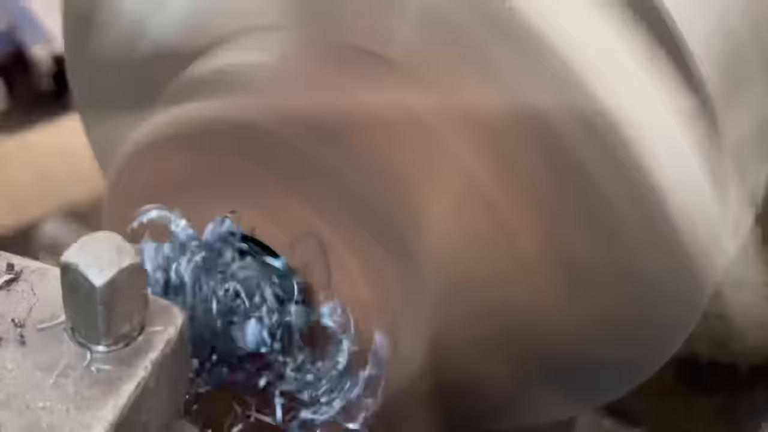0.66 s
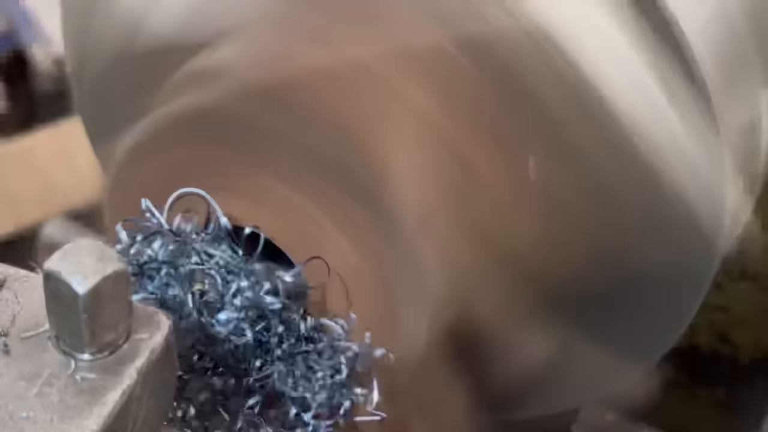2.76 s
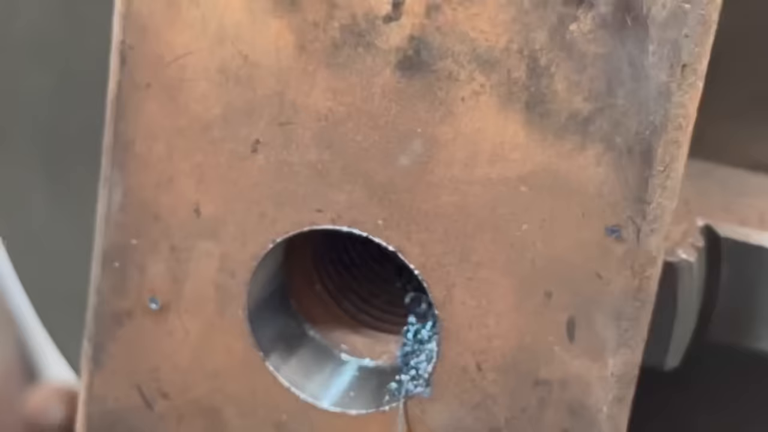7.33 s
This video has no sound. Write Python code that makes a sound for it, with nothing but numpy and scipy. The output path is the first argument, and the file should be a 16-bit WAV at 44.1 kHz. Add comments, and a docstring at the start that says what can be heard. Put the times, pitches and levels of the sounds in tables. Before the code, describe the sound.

From the start, a lathe tool boring steel gives a loud, piercing squeal, close by in a workshop. It wobbles rapidly, and at about 0.6 seconds it jumps slightly higher and turns rougher, over the bright rasp of shearing chips. From about 2.5 seconds the squeal stutters in short bites, then stops abruptly around 3.3 seconds. Everything afterwards is much quieter. The spindle whirrs freely with a few faint metallic rings and coasts down between about 4.7 and 6 seconds. The motor's steady low hum and fan noise carry on, gradually growing louder. From about 6 seconds a rough low drone swells, strongest around 7 to 8.3 seconds, with a few faint high squeaks and tiny ticks. At about 8.8 seconds comes one short, gritty hiss with a metallic ring. The motor hums on until the end, at about 9.5 seconds.

```python
"""Boring steel on a lathe.

The boring bar chatters: a loud squeal that wobbles once a turn, over the rasp of the shearing chip.
The tool breaks through in short bites; the spindle whirrs free and coasts down. The motor hums on,
louder as the phone moves. A low drone swells, with faint squeaks and ticks; one short hiss follows."""
import sys
import numpy as np
from scipy import signal
from scipy.fft import rfft, irfft, next_fast_len
from scipy.io import wavfile
from scipy.ndimage import uniform_filter1d

SR = 44100
rng = np.random.default_rng(int(sys.argv[2]) if len(sys.argv) > 2 else 0)


def log_audio(samples):
    """Write samples as a 16-bit WAV file to the path given in sys.argv[1]."""
    # one column per channel
    frames = np.atleast_2d(samples).T
    # limit to full scale, then quantise
    limited = np.clip(frames, -1, 1)
    pcm = np.round(limited * 32767).astype(np.int16)
    wavfile.write(sys.argv[1], SR, pcm)


N = 422478
T = np.arange(N) / SR
JUMP_S, BREAKTHROUGH_S, CHIP_END_S, CLEAR_S = .587, 2.73, 2.785, 3.306  # stages of the cut

# noise spectra: f/Hz, relative level/dB
FAN_SPECTRUM = [(50, -40), (200, -14), (400, -4.5), (650, -1.5), (900, -5), (1400, -4.5), (1700, -9),
                (2300, -8.5), (3000, -11.5), (3800, -8.5), (4300, -18.5), (4900, -9.5), (7200, -26),
                (10400, -24), (16000, -38)]
RUMBLE_SPECTRUM = [(25, -48), (50, -19), (75, -20), (100, 1.5), (135, -8), (200, 0), (330, -3), (420, -8),
                   (700, -34)]
TICK_SPECTRUM = [(3000, -25), (8000, -8), (10500, 2), (15500, 0)]
HISS_SPECTRUM = [(200, -30), (400, -0.5), (1400, -1.5), (2200, -6), (4800, -5), (6500, -9.5), (9000, -9.5),
                 (16000, -12)]
WHIRR_SPECTRUM = [(50, -40), (150, -10), (300, -9.5), (500, -7.5), (760, -6.5), (950, -1.5), (1150, 2),
                  (1550, -3.5), (1950, -5), (2400, -1.5), (3200, -2), (3900, -8.5), (5100, -10.5),
                  (6200, -17.5), (8100, -18), (16000, -31.5)]
RASP_SPECTRUM = [(2000, -26), (3800, -11), (4800, -9.5), (6500, -10.5), (7400, -5), (8800, 2), (9700, 5.5),
                 (10600, 0.5), (12300, -1), (13200, -11), (14500, -22), (15500, -15)]
# resonances: f/Hz, width/Hz, relative level/dB
CASING_MODES = [(1473, 105, 5.5), (2640, 106, 5.5), (3850, 260, -7), (4770, 250, -8)]
HISS_MODES = [(495, 31, 12), (1350, 160, -8), (2694, 32, 8), (3710, 90, 0), (4330, 55, -4), (4880, 110, -2),
              (8820, 70, -5)]
TOOL_POST_MODES = [(9160, 100, 6), (9700, 240, 6)]
LOW_NOTE_MODES = [(4370, 790, -6.5), (9700, 400, 5), (11800, 700, 0)]
# motor hum: t/s, level/dB
HUM_LEVEL = [(0.0, -54), (0.08, -52.5), (3.71, -51), (6.67, -45.5), (7.15, -45), (9.58, -38)]
# motor whine, gears at top speed: f/Hz, relative level/dB
WHINE_TONES = [(1255, -61), (1433, -60), (2106, -64), (2219, -67), (2316, -60.5), (2663, -51.5),
               (2850, -68), (2905, -67), (3026, -66), (3247, -63.5), (3678, -67), (3918, -62.5),
               (4960, -67.5)]
GEAR_TONES = [(470, -20.5), (942, -21.5), (1098, -16), (1184, -24), (1265, -23.5), (1502, -14),
              (1800, -21.5), (2140, -21), (2300, -18), (2444, -16.5), (2690, -15.5), (3009, -21),
              (3275, -18.5)]
# drone partials: order, relative level/dB, flutter/dB
DRONE_ORDERS = [(1, -17, 3), (2, -0.5, 1), (2.5, -14, 2), (3, 0, 2), (3.07, -7.5, 3.5), (3.25, -13, 1.5),
                (3.5, -10, 3.5)]
# lingering drone partials: order, level/dB
LINGERING_ORDERS = [(1, -58), (3.47, -52.5)]
# drone swells: centre t/s, half length/s, gain/dB
DRONE_SWELLS = [(7.003, .24, 6), (7.6, 0.5, 11.5), (8.3, 0.087, 8)]
# squeaks: t/s, f/Hz, level/dB
SQUEAKS = [(6.03, 10600, -62), (7.83, 10500, -58), (8.23, 11400, -53.5)]
# spindle speed: t/s, rate/Hz
SPINDLE_SPEED = [(0, 18.42), (1.2, 18.42), (1.5, 18.68), (4.6, 18.75), (4.9, 17.6), (5.6, 14.5)]
# spindle rings: centre t/s, half length/s, f/Hz, level/dB
SPINDLE_RINGS = [(3.8, .08, 1107, -54), (4.227, .025, 1110, -52), (4.6, .14, 1503, -55),
                 (5.2, 0.12, 1766, -59)]
# breakthrough bites: t/s, length/s, force/dB, depth of the gap after (0-1)
BITES = [(2.482, 0.043, -0.5, 0.84), (2.526, 0.051, 0.5, .7), (2.581, 0.047, 1, 0.7),
         (2.631, 0.048, 0.5, 0.6), (2.688, 0.036, -1, .9), (2.746, 0.037, -1, 0.5), (2.796, 0.028, 0, 0.7),
         (2.855, 0.025, 1.5, 0.2), (2.905, 0.037, -1, 0), (2.958, 0.031, 1.5, 0), (2.99, 0.051, 0, 0),
         (3.065, 0.039, 0, .1), (3.109, 0.047, 1.5, .65), (3.182, 0.025, 1, .95), (3.226, 0.027, 4.5, 1),
         (3.287, 0.016, 3.5, 0)]
# chatter pitch: t/s, f/Hz, wobble scale/Hz
CHATTER_PITCH = [(0, 2599, 20), (.51, 2602, 20), (.535, 2712, 36), (.56, 2605, 30), (.59, 2726, 32),
                 (.72, 2725, 44), (.83, 2732, 44), (.92, 2754, 17), (1.08, 2752, 15), (1.13, 2778, 27),
                 (1.38, 2792, 24), (1.52, 2798, 6), (1.79, 2803, 14), (1.86, 2829, 15), (2.3, 2831, 8),
                 (2.66, 2843, 11), (2.92, 2866, 11), (3.3, 2876, 11)]
# chatter fundamental at the microphone ports: f/Hz, left level/dB, right level/dB
PORT_LEVEL = [(2600, -30.5, -29.3), (2745, -33.5, -23), (2790, -42, -23.6), (2830, -42, -23.7),
              (2870, -38.5, -24.5)]
# right port behind left: f/Hz, lag/rad
PORT_LAG = [(2600, 2.7), (2820, 3.2), (2865, 4.95), (5200, 6.9), (7800, 6.3), (11400, 6.6), (13000, 8.3),
            (13750, 10.2), (14130, 11.0), (14340, 11.7), (15600, 12.1)]
# overtone radiation of bar and tool post: f/Hz, relative level/dB
BAR_RADIATION = [(5200, -1.5), (5500, -3), (5650, -1.5), (5750, -21), (7800, -10), (8250, -7), (8500, 2),
                 (8620, -11.5), (10400, -2), (11000, -5), (11300, 3), (11480, -9), (12750, 5), (13750, 6),
                 (14300, 3), (15600, -4.5)]
# sidebands: chatter order, segment rates added
SIDEBAND_ORDERS = [(1, 1), (2, -1), (2, 1), (3, -1), (3, 1), (4, -1)]
# same rows: level/dB at JUMP_S, level/dB at CHIP_END_S
SIDEBAND_LEVELS = [(-57.5, -56.5), (-62.5, -52), (-56, -70), (-54.5, -47), (-44, -65), (-51, -72)]


def undb(db):
    """Decibels to gain."""
    return 10 ** (np.asarray(db) / 20)


def unit(x):
    """Scale to rms 1."""
    return x / np.sqrt(np.mean(x ** 2))


def ramp(middle_s, length_s):
    """Linear rise, 0 to 1."""
    return np.clip((T - middle_s) / length_s + .5, 0, 1)


def swell(centre_s, half_s):
    """Gaussian bell, peak 1."""
    return np.exp(-((T - centre_s) / half_s) ** 2)


def since(start_s):
    """Seconds elapsed, 0 before the start."""
    return np.maximum(T - start_s, 0)


def curves(table):
    """Table columns interpolated over time."""
    times_s, *columns = np.transpose(table)
    return [np.interp(T, times_s, column) for column in columns]


def colour(spectrum, hz):
    """Gain of a spectrum at given frequencies."""
    points_hz, db = np.transpose(spectrum)
    return undb(np.interp(np.log(hz + 1), np.log(points_hz), db))


def walk(rate_hz):
    """Smooth random drift, spread near 1."""
    k = max(int(SR / rate_hz), 2)
    steps = np.repeat(rng.standard_normal(N // k + 1), k)
    return 1.308 * uniform_filter1d(uniform_filter1d(steps, k), k)[:N]


def angle(hz):
    """Running phase in rad."""
    return 2 * np.pi * np.cumsum(hz) / SR


def noise(spectrum=None, modes=None, side_db=-12):
    """Stereo noise, rms 1, shaped by a spectrum or resonances; bass near mono."""
    size = next_fast_len(N)
    hz = np.arange(size // 2 + 1) * SR / size
    if modes is None:
        gain = colour(spectrum, hz)
    else:
        gain = np.sqrt(sum((undb(db) / (1 + 2 * ((hz - f) / width) ** 2)) ** 2 for f, width, db in modes))
    spread = undb(side_db) * colour([(200, -13.5), (700, -6), (3000, 7.5), (7000, -15.5)], hz)
    mid, side = rfft(rng.standard_normal((2, size)))
    stereo = mid + np.array([[1], [-1]]) * spread * side
    return unit(irfft(gain * stereo, size)[:, :N])


def tones(rows, speed, stray_hz, flutter_db, flutter_hz=18):
    """Tones scaled in pitch by speed, each with its own drift, flutter and stereo lag."""
    out = np.zeros((2, N))
    for hz, db in rows:
        phase = angle(hz * speed + stray_hz * walk(30))
        lag_rad = min(hz / 2500, .6) * rng.standard_normal()
        out += np.sqrt(2) * undb(db + flutter_db * walk(flutter_hz)) * np.sin([phase, phase + lag_rad])
    return out


def workshop(x, t60_s=.8, treble_t60_s=.29, split_hz=5000):
    """Dense stereo reverberation; treble dies first."""
    t = np.arange(SR // 2) / SR
    scatter = rng.standard_normal((2, len(t))) * (t > .003)
    low = signal.sosfilt(signal.butter(2, split_hz, fs=SR, output="sos"), scatter)
    tail = low * undb(-60 * t / t60_s) + (scatter - low) * undb(-60 * t / treble_t60_s)
    tail /= np.sqrt(np.sum(tail ** 2, axis=1, keepdims=True))
    return signal.fftconvolve(x[None], tail, axes=1)[:, :N]


def motor(hum_hz=179.8, shaft_hz=22.27, throb_db=2):
    """Magnetic hum, fan air ringing the casing, whine throbbing with the shaft, rumble."""
    hum_db, = curves(HUM_LEVEL)
    shade = 1 - ramp(4.85, 1.6)  # fan and whine come into the open
    hum = tones([(hum_hz, 0)], 1, stray_hz=.35, flutter_db=.5)
    fan_gain = undb(-3.5 - 4.5 * shade + .52 * walk(14))
    air = undb(-.5) * noise(FAN_SPECTRUM, side_db=-5.5)
    casing = undb(-8) * noise(modes=CASING_MODES, side_db=-14)
    throb = undb(throb_db * np.sin(angle(shaft_hz + 2 * walk(10))))
    whine = undb(42 - 7 * shade) * tones(WHINE_TONES, 1, stray_hz=5, flutter_db=2.2, flutter_hz=110)
    rumble = undb(-6.5 + 1.4 * walk(9.9)) * noise(RUMBLE_SPECTRUM, side_db=-6)
    return undb(hum_db) * (hum + fan_gain * (air + casing) + throb * whine + rumble)


def drone(start_hz=106, end_hz=97.8, rise_db_per_s=6.5, risen_s=6.26):
    """Rough low drone: swells, sags in pitch and beats; two orders linger."""
    hz = start_hz + (end_hz - start_hz) * ramp(6.68, 1.09)
    swells_db = sum(db * swell(centre_s, half_s) for centre_s, half_s, db in DRONE_SWELLS)
    level_db = -55.5 - rise_db_per_s * np.maximum(risen_s - T, 0) + swells_db
    orders = sum(tones([(order, db)], hz, stray_hz=1.794, flutter_db=flutter_db, flutter_hz=40)
                 for order, db, flutter_db in DRONE_ORDERS)
    lingering = ramp(7.77, .93) * tones(LINGERING_ORDERS, hz, stray_hz=2.86, flutter_db=1)
    return undb(level_db) * orders + lingering


def bump():
    """Soft, low noise bump."""
    return undb(-50) * swell(3.76, .055) * noise(RUMBLE_SPECTRUM)


def rattle(ticks_per_s=42, decay_s=.003, scatter_db=4):
    """Tiny uneven ticks, as of loose chips settling."""
    hits = (rng.random(N) < ticks_per_s / SR) * undb(scatter_db * rng.standard_normal(N))
    ticks = unit(signal.lfilter([1], [1, -np.exp(-1 / (decay_s * SR))], hits))
    return undb(-68.5) * swell(7.8, 1.1) * ticks * noise(TICK_SPECTRUM)


def squeaks(rise_s=.015, t60_s=.22, stray_hz=110):
    """Faint high squeaks, ringing briefly."""
    scratch = angle(stray_hz * walk(1500))
    out = 0
    for start_s, hz, db in SQUEAKS:
        envelope = np.minimum(since(start_s) / rise_s, 1) * undb(db - 60 * since(start_s + rise_s) / t60_s)
        out += np.sqrt(2) * envelope * np.sin(2 * np.pi * hz * T + scratch)
    return out


def hiss(start_s=8.803, rise_s=.037, hold_s=.052, fade_s=.31, grit_db=1.5):
    """Short gritty hiss with a metallic ring, then a faint high puff."""
    rise = np.minimum(since(start_s) / rise_s, 1)
    fade = np.maximum(1 - since(start_s + rise_s + hold_s) / fade_s, 0)
    air = fade ** 1.7 * undb(grit_db * walk(220)) * noise(HISS_SPECTRUM, side_db=-8)
    ring = fade * undb(-3) * noise(modes=HISS_MODES)
    puff = undb(-52) * swell(9.35, .03) * noise(TICK_SPECTRUM)
    return undb(-37) * rise * (air + ring) + puff


def spindle(turn_rad, speed, peak_s=4.77, fade_10db_s=.91, drive_off_s=4.65):
    """Gears whine and the spinning block stirs air; both fade on the coast-down."""
    level_db = -45 - .83 * np.maximum(peak_s - T, 0) - 10 * (since(peak_s) / fade_10db_s) ** 2
    air = noise(WHIRR_SPECTRUM, side_db=-7.5) * undb(np.cos(turn_rad) + .5 * walk(10))
    gears = undb(-12 * since(drive_off_s)) * tones(GEAR_TONES, speed, stray_hz=7.14, flutter_db=3)
    return undb(level_db) * (air + gears)


def spindle_rings():
    """Brief metallic rings from the free-running spindle."""
    return sum(swell(centre_s, half_s) * tones([(hz, db)], 1, stray_hz=14, flutter_db=2.5)
               for centre_s, half_s, hz, db in SPINDLE_RINGS)


def load(turn_rad, spot_turns=.19, width_turns=.1915):
    """The edge meets one hard spot per turn, never quite alike; mean 0, rms 1."""
    offset_turns = (turn_rad / (2 * np.pi) - spot_turns + .5) % 1 - .5
    spot = np.exp(-(offset_turns / width_turns) ** 2) * (1 + .309 * walk(18))
    return unit(spot - spot.mean())


def contact(edge_s=.0048, gap_delay_s=.0068, gap_half_s=.0038):
    """Grip of the edge, steady then in bites, and a gate that dips the note between bites."""
    grip, gate = 1 - ramp(BITES[0][0], edge_s), 1
    for start_s, length_s, db, depth in BITES:
        end_s = start_s + length_s
        grip += undb(db) * (ramp(start_s, edge_s) - ramp(end_s, edge_s))
        gate *= 1 - depth * swell(end_s + gap_delay_s, gap_half_s)
    return grip, gate


def rough_state():
    """0 on the low note, 1 on the rough high note: one flick up, then the jump."""
    return ramp(JUMP_S, .014) + swell(.544, .014)


def release_db(fall_db_per_s=123, graze_s=3.402):
    """The cut dies away once the edge is clear, with one last graze."""
    return -5 * ramp(CLEAR_S, .011) - fall_db_per_s * since(CLEAR_S) + 8 * swell(graze_s, .012)


def rasp_top(grip, fall_db_per_s=10):
    """Bright top edge of the chip's rasp: a fine hiss near 15 kHz."""
    gain = undb(-42 - fall_db_per_s * T) + undb(-46) * ramp(CHIP_END_S, .02)
    touch = .89 * grip + .2 * (1 - ramp(CLEAR_S, .02))
    return touch * gain * noise(modes=[(14900, 1200, 0)])


def chip_rasp(grip, last_chip_s=2.872):
    """The chip shears in tiny uneven steps and rings the tool post; weaker on thin bites."""
    rough = rough_state()
    thin = ramp(CHIP_END_S, .12) - swell(last_chip_s, .025)
    level_db = -49 + 14.5 * rough - 14 * thin + release_db()
    shear = noise(RASP_SPECTRUM, side_db=-20) * undb(2 * walk(900))
    post = undb(-7) * noise(modes=TOOL_POST_MODES, side_db=-15)
    low_note_ring = undb(-44.5) * (1 - rough) * noise(modes=LOW_NOTE_MODES)
    return (shear + post) * undb(level_db) * (.24 + .54 * grip) + low_note_ring


def sidebands(phase, segment_hz=922, rise_hz_per_s=58, stray_hz=22, flutter_db=3):
    """Chip segments shake the bar, adding clashing tones beside its harmonics."""
    segment_phase = angle(segment_hz + rise_hz_per_s * since(JUMP_S) + stray_hz * walk(200))
    out = 0
    for (order, side), ends_db in zip(SIDEBAND_ORDERS, SIDEBAND_LEVELS):
        level_db = np.interp(T, [JUMP_S, CHIP_END_S], ends_db) + flutter_db * walk(120)
        out += np.sqrt(2) * undb(level_db) * np.sin(order * phase + side * segment_phase)
    return out * rough_state() * (1 - ramp(CHIP_END_S, .022))


def edge_ring():
    """Rubbing keeps one high tool mode ringing."""
    return undb(-54) * noise(modes=[(9880, 180, 0)])


def port_lag(hz):
    """Lag of the right port in rad."""
    return np.interp(hz, *np.transpose(PORT_LAG))


def bar_overtones(phase, hz, ease, grip, top_order=6):
    """Overtones need the edge to rub and swell under load; higher ones flutter more, stop sooner."""
    level_db = -22 - 1.5 * T - 11.5 * since(BREAKTHROUGH_S) + release_db()
    gains = [colour(BAR_RADIATION, order * hz) for order in range(2, top_order + 1)]
    drive = undb(level_db - 1.4 * ease) / np.sqrt(sum(gain ** 2 for gain in gains))
    rub = .08 + .92 * grip
    out = 0
    for order, gain in enumerate(gains, 2):
        envelope = (1 + .065 * order * walk(300)) * rub ** (order / 5)
        out += drive * gain * envelope * np.sin([order * phase, order * phase - port_lag(order * hz)])
    return out


def bar_fundamental(phase, centre_hz, wobble_hz, ease, echo_s=.004762, load_dip_db=1):
    """The bar's own note: dips under load, rougher with wide wobble, weaker as the bites thin."""
    pitch_hz, *ports_db = np.transpose(PORT_LEVEL)
    fade_db = release_db() - 2 * since(BREAKTHROUGH_S)
    left_db, right_db = (np.interp(centre_hz, pitch_hz, db) + fade_db for db in ports_db)
    rough = rough_state()
    left_gain = undb(left_db + 1 + (1 + 2.5 * rough) * walk(130))
    left = left_gain * np.sin(phase + (.2 + .7 * rough) * walk(90))
    right = undb(right_db + .45 * walk(90)) * np.sin(phase - port_lag(centre_hz))
    right -= .52 * np.interp(T - echo_s, T, right, left=0)  # inverted echo off the block's face
    dip_db = load_dip_db * ease * (T < BITES[0][0])
    flutter_db = walk(130) + .04 * wobble_hz * walk(300)
    return undb(dip_db + flutter_db) * np.array([left, right])


def boring(turn_rad, room_db=-19):
    """The bar chatters over the chip's rasp; each turn's load peak pulls the pitch down."""
    centre_hz, wobble_hz = curves(CHATTER_PITCH)
    grip, gate = contact()
    ease = -.75 * load(turn_rad) + .22 * walk(45)  # negative under load
    hz = centre_hz + wobble_hz * (ease + .45 * walk(400)) + 7 * walk(160) + 7 * walk(1500)
    phase = angle(hz)
    sustain = gate * (.58 + .42 * grip)  # the bar rings on between bites
    squeal = sustain * bar_fundamental(phase, centre_hz, wobble_hz, ease)
    squeal += bar_overtones(phase, hz, ease, grip)
    rasp = chip_rasp(grip) + grip * (sidebands(phase) + edge_ring())
    return squeal + rasp + rasp_top(grip) + undb(room_db) * workshop(squeal[0] + squeal[1] + rasp[0])


def pan(left_minus_right_db):
    """Stereo gain pair."""
    return undb(np.array([[.5], [-.5]]) * left_minus_right_db)


def scene():
    """One spindle paces cut and gears; the motor runs throughout, slightly right."""
    rate_hz, = curves(SPINDLE_SPEED)
    turn_rad = angle(rate_hz)
    machine = (motor() + drone()) * pan(-.9)
    machine += spindle(turn_rad, rate_hz / rate_hz.max()) * pan(-.5)
    return machine + boring(turn_rad) + spindle_rings() + bump() + hiss() + squeaks() + rattle()


def record(dry, cutoff_hz=15800):
    """The phone's steep low-pass."""
    return signal.sosfilt(signal.ellip(10, .2, 80, cutoff_hz, fs=SR, output="sos"), dry)


dry = scene()
out = record(dry)
log_audio(out)
```